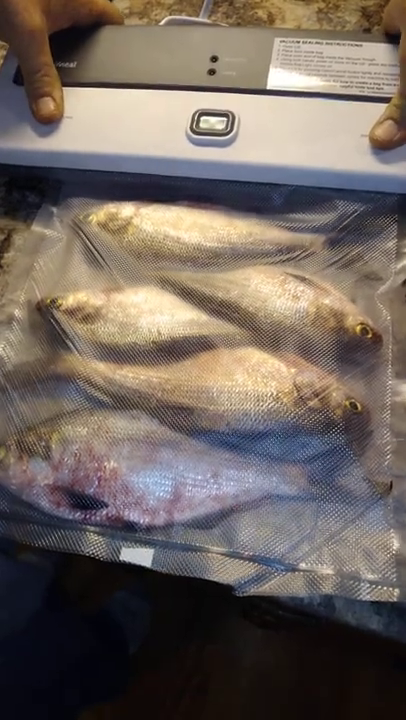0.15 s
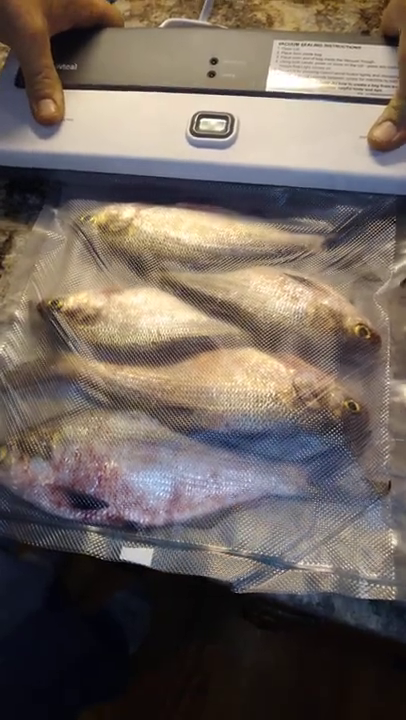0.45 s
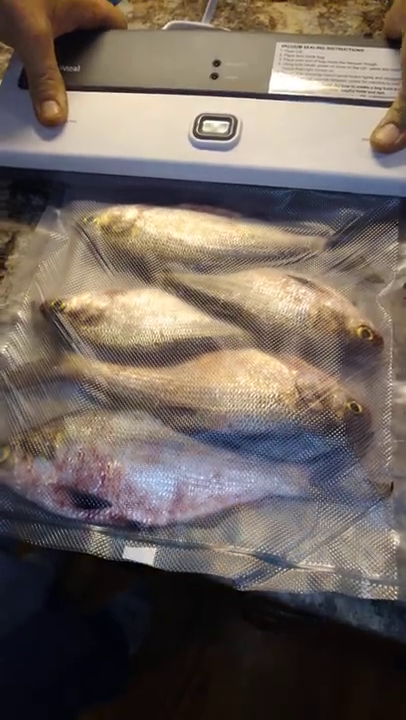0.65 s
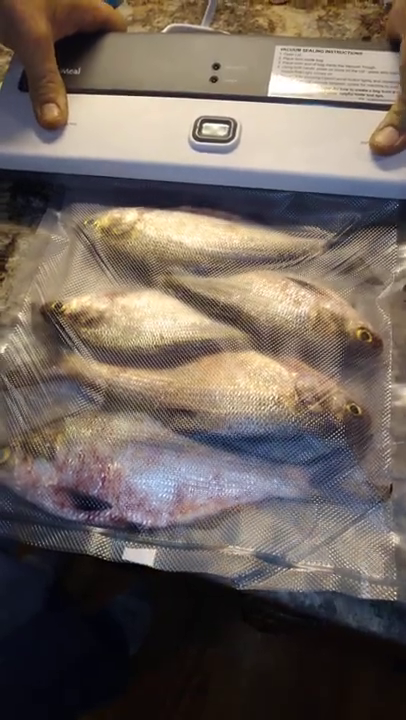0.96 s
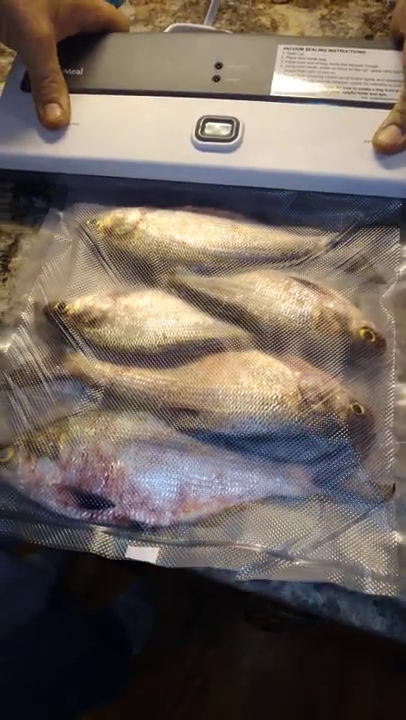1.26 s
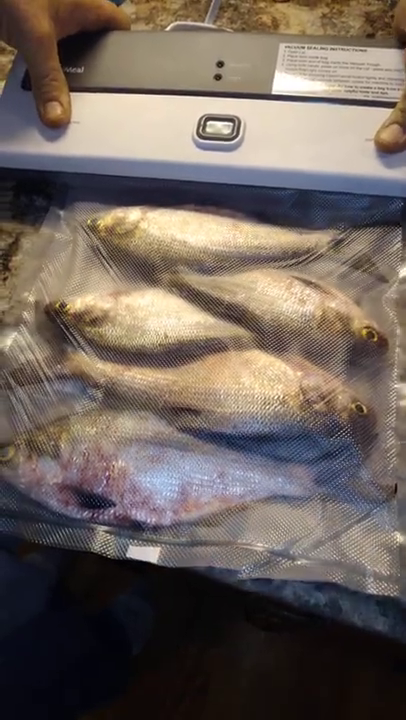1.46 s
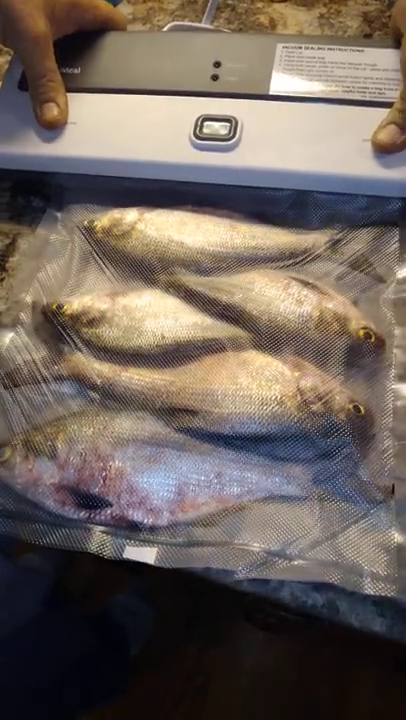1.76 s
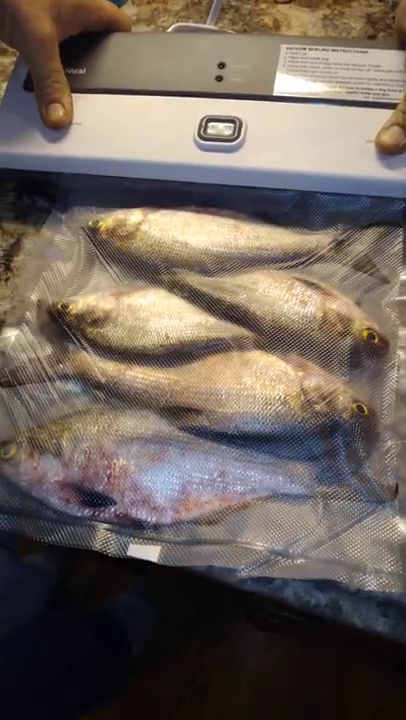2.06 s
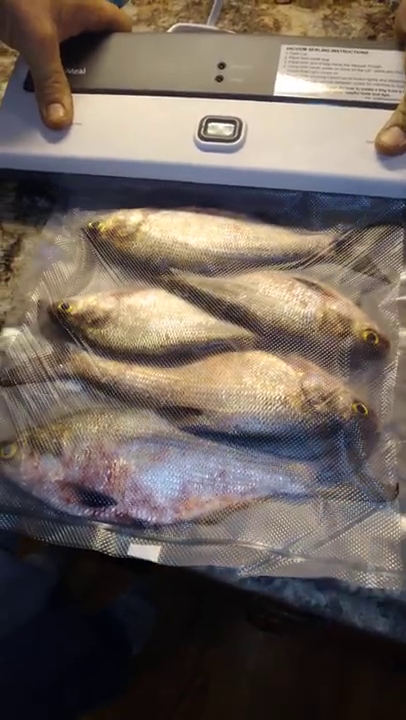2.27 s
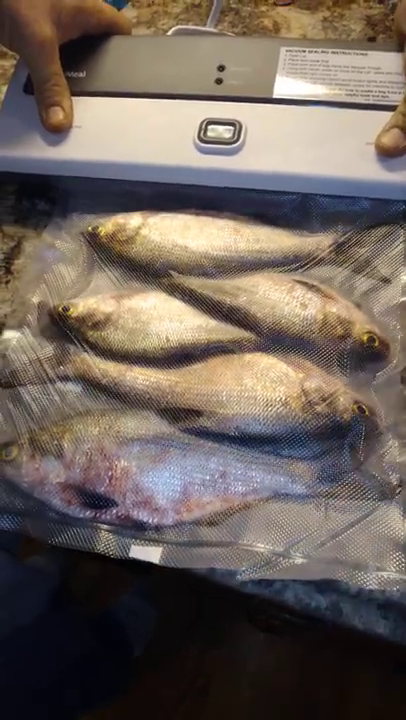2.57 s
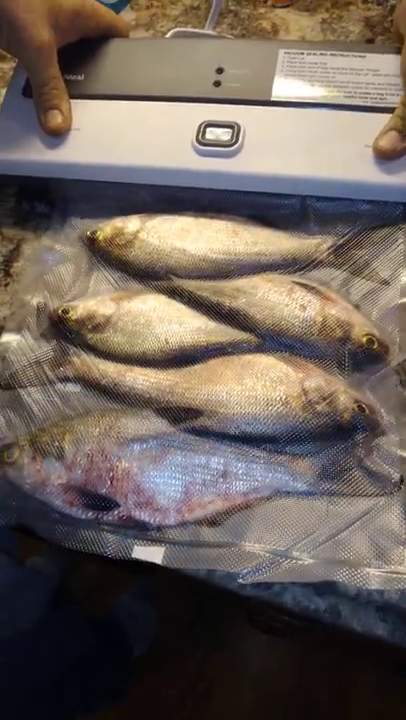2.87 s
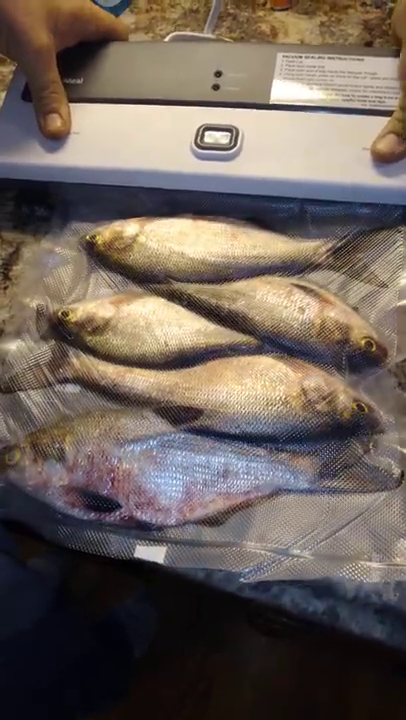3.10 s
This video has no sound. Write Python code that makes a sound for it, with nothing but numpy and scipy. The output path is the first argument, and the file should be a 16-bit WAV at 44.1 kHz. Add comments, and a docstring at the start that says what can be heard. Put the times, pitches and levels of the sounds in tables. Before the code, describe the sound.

Small electric pump of a bag sealer buzzing steadily up close, with faint late plastic ticks.

```python
"""A small vacuum-sealer pump on a kitchen counter, close to a two-microphone phone; the sound is loud at first,
then its level drops and settles. Its hum is a stack of tones at multiples of the stroke rate; its rattle is a
noise burst nearly repeated each stroke. Air noise is coloured hiss under both. Thin whines, noise through
narrow resonances, mostly of the housing, swell and fade, each over its own stretch of time; near the end a few
of them strengthen multiples of the hum. Three plastic ticks of the bag are short decaying snaps of filtered
noise. The pump's sound reaches the left microphone slightly later; the ticks are louder on the right."""
import sys
import numpy as np
from scipy import signal
from scipy.fft import rfft, irfft
from scipy.io import wavfile
from scipy.ndimage import uniform_filter1d

SR = 44100
rng = np.random.default_rng(int(sys.argv[2]) if len(sys.argv) > 2 else 0)


def wav_record(signal):
    """Record a signal, one row per channel, as 16-bit PCM in the file named by sys.argv[1]."""
    frames = np.transpose(np.atleast_2d(signal))
    bounded = np.clip(frames, -1, 1)
    # unit amplitude maps onto the largest positive 16-bit level
    quanta = np.round(bounded * 32767).astype(np.int16)
    wavfile.write(sys.argv[1], SR, quanta)


N = 142884

# Pump speed: time_s, stroke_rate_hz
PUMP_SPEED = [(0, 60.9), (.17, 60.9), (.25, 60.55), (.35, 60.4), (.53, 59.99), (1.2, 60), (2.3, 59.995),
              (2.9, 59.8), (3.24, 59.3)]
# Hum, one row per multiple of the stroke rate, before the level changes:
# settled_left_db, settled_right_db, starting_left_db, starting_right_db
HUM_TONES = [(-61.5, -59.0, -65.0, -62.5), (-49.0, -46.0, -47.0, -43.5), (-51.5, -49.5, -54.0, -51.0),
             (-65.0, -66.0, -69.0, -69.0), (-63.5, -63.5, -74.0, -72.0), (-59.0, -56.0, -54.5, -50.5),
             (-60.0, -57.5, -70.5, -71.0), (-57.5, -44.0, -56.0, -62.5), (-56.5, -49.0, -53.5, -50.5),
             (-54.0, -44.0, -52.5, -42.5), (-56.0, -48.0, -55.5, -48.0), (-59.0, -61.5, -72.0, -55.5),
             (-65.5, -63.5, -56.5, -55.5), (-64.0, -61.0, -62.0, -65.0), (-54.0, -53.0, -52.5, -50.0),
             (-53.0, -62.0, -61.0, -61.0), (-53.0, -62.5, -57.0, -62.5), (-65.0, -60.5, -56.0, -67.5),
             (-53.0, -54.0, -53.0, -54.5), (-65.0, -65.0, -58.5, -64.0), (-68.5, -55.5, -65.0, -59.0),
             (-58.0, -60.0, -60.0, -61.0), (-67.5, -59.5, -67.0, -65.5), (-57.0, -57.5, -61.0, -65.0),
             (-59.5, -55.5, -70.0, -55.5), (-62.0, -57.5, -64.0, -64.5), (-64.0, -63.0, -63.5, -55.5),
             (-59.5, -57.5, -66.0, -62.5), (-69.0, -69.0, -72.5, -62.0), (-62.5, -63.0, -67.0, -64.0)]
# Phase lead at the left microphone for multiples above LOCKED, arriving by other paths: lead_rad
LEFT_LEADS_RAD = [-2, .3, 3.1, -2, -2.2, 1.4, -2.4, -1.1, .6, -2.2, -2.9, 3.1, 1.2, -2.6, 1.6, 2, .1, -2.4]
# Level of six bands, used relative to SETTLED_S:
# time_s, bass_db, low_middle_db, middle_db, low_treble_db, treble_db, top_db
BAND_LEVELS = [(0.0, -35, -31, -33.5, -32, -33.5, -40), (0.07, -32.5, -29, -33.5, -31.5, -36, -38.5),
               (0.13, -33.5, -29, -34, -31.5, -34.5, -37.5), (0.22, -44.5, -34.5, -41, -36, -38.5, -39.5),
               (0.33, -47, -39, -50, -41.5, -41, -44.5), (0.41, -47, -40, -52, -45, -46, -45),
               (1.06, -47, -39.5, -52, -42.5, -49.5, -45.5), (1.41, -47, -40.5, -51, -47, -49.5, -47),
               (2.3, -46.5, -41, -52, -48.5, -46, -49), (2.73, -46.5, -43.5, -50, -49, -48, -47.5),
               (3.0, -46.5, -46.5, -48.5, -52, -48, -48.5), (3.1, -44.5, -46.5, -48, -45.5, -49, -46.5),
               (3.24, -46, -43, -51, -51, -47, -49)]
# Centres of those six bands: centre_hz
BAND_CENTRES = [150, 570, 1250, 2600, 6500, 14000]
# Relative rattle colour: pitch_hz, then settled_left, settled_right, starting_left, starting_right (dB per Hz)
RATTLE_COLOUR = [(1835, -4, -6, -10.5, -8), (2080, 5.5, 4.5, 0.5, 2), (2240, -9.5, 4.5, -6, -0.5),
                 (2480, -6.5, -22.5, -32, -26), (2960, -4.5, 5, 2, -2), (3530, 10, -2, -6.0, 6.5),
                 (3840, -13.5, 9, 2, -2), (4060, 13.5, 7.5, 11.5, 8), (4790, 0.5, -0.5, 6.5, 5),
                 (5380, -2, -2, 5.5, -10), (5830, 1, -0.5, -12, -27), (6540, -3.5, 5, 2, 7.5),
                 (7330, -1.5, -0.5, 1.5, -11), (8160, -9, -8, -14, -11), (8850, -8.5, -2.5, -7.5, -1),
                 (9530, -3, 6.5, -8, 5), (11600, -13, 3, -22, 0.5), (13000, -5.5, 4, -6, -2.5),
                 (14300, -8.5, -1.5, -10.5, -0.5), (15500.0, -18.5, -1.5, -8, -1)]
# Relative air noise colour: pitch_hz, level (dB per Hz)
AIR_COLOUR = [(15, -52), (40, -19), (117, -2.5), (231, -4), (475, -1), (604, -8), (784, -3.5), (2090, -6.5),
              (2410, -6.5), (3000, -8.5), (3900, -57), (6600, -120)]
# Resonance pitches at rated speed: pitch_hz; most are housing resonances, but 360, 960 and 1200 Hz sit on the
# 6th, 16th and 20th multiples and strengthen the hum near the end
WHINE_PITCHES = [4440, 4260, 3600, 3560, 6600, 6400, 9740, 9720, 10510, 12100, 12860, 15300, 11780, 9480,
                 3440, 3290, 3930, 15100, 360, 960, 1200, 2380]
# One row per resonance, level before fades and throb; an end before its start leaves it at rest: #
# smoothing_width_hz, level_db, start_s, end_s, left_minus_right_db
WHINE_STRETCHES = [(67.5, -35.5, 0.36, 1.3, 14.5), (67.6, -37.5, 0.19, 1.346, -15),
                   (105, -39.5, 0.24, 1.32, -6.5), (86.5, -51.5, 1.35, 2.65, -14),
                   (63.5, -52, 0.42, 2.32, 21.5), (88, -46, 1.73, 2.8, -12.5),
                   (110, -40.5, 0.22, 1.33, -23.5), (54, -47, 1.5, 2.1, -11), (81, -42, 0.67, 2.16, -15),
                   (68.4, -51, 0.26, 1.3, -12), (92, -41.5, 1.14, 3, 1), (120, -52.5, 1.2, 2.65, -22),
                   (91, -47, 2.15, 2.85, -15), (75, -46.5, 2.53, 2.86, -20), (99, -41.5, 2.72, 3.2, -2),
                   (200, -42.5, 2.96, 3.3, 7), (75, -32, 3.6, 3.15, 2), (200, -49, 2.8, 3.8, 14),
                   (40, -50, 3.13, 3.3, 9), (39.5, -44.5, 3.12, 3.3, 11), (40, -47.5, 3.14, 4.9, 14.5),
                   (219, -47, 3.11, 4.3, 10)]
# Plastic ticks of the bag, peak before the microphone balance: start_s, peak_db, pitch_hz
BAG_TICKS = [(2.603, -47, 1000), (2.786, -41, 1400), (3.092, -25.5, 10000)]
# Likeness of the two microphones: pitch_hz, shared_part (0 to 1)
MIC_LIKENESS = [(60, .97), (500, .85), (2000, .5), (6000, .3), (10000, .1), (15000, .2)]
# Passage from starting to settled colour: time_s, starting_share (0 to 1)
STARTING_SHARE = [(.2, 0.96), (.45, 0)]
# Part of the noise that is new each stroke: pitch_hz, new_share (0 to 1)
NEW_SHARE = [(1500, .22), (4500, .3), (7000, .42), (15000, .5)]

RATED_HZ, FIRST_TURN = 60, .02  # strokes per second; stroke position at the start (turns)
SETTLED_S = 2  # moment that the band levels are compared with
LEFT_LAG_S = 0.0003554  # later arrival at the left microphone
EDGE_HZ = 15700  # upper band limit

HUM_LEAD, HUM_SWEEP = .43, .012  # hum ahead of rattle; delay growing with the multiple (turns)
LOCKED, HUM_SCATTER = 12, 1.5  # last multiple that pulses in step; phase spread above it (rad)
HUM_WAVER_DB, HUM_SLIP = .7, .01  # level wander; phase wander per multiple (rad)

RATTLE_DB, JAGGED = -33.5, .75  # level before band changes; spectral unevenness kept (0 to 1)
BURST_DEPTH, RIPPLE = .66, .22  # loudness dip between strokes; depth of the three smaller knocks
DRIFT_PER_S = .61  # burst shapes passed through per second
PATCH_DB, PATCH_S = 3.2, .6  # size of small drifting spectral peaks; length of each smoothing

AIR_DB, AIR_PAN_DB = -52.5, -1.5  # level before band changes; left against right

WHINE_LEAD, WHINE_LOOSE = .15, .2  # ahead of rattle (turns); gain of chatter new each stroke
WHINE_FADE_S, WHINE_THROB, WHINE_REST = .12, .6, .04  # fade; burst exponent; gain outside its stretch

TICK_WIDTH, TICK_T60 = .49, .066  # share of the pitch; time to fall 60 dB (s)


def amp(db):
    """Turns decibels into gain."""
    return 10 ** (np.asarray(db) / 20)


def evened(x):
    """Scales a signal to unit mean power."""
    return x / np.sqrt(np.mean(x ** 2) + 1e-20)


def read(points, hz):
    """Reads a curve along a logarithmic pitch axis."""
    f, value = np.transpose(points)
    return np.interp(np.log(hz + 1), np.log(f + 1), value)


def level_db(t, hz):
    """Level of each frequency over time, against the settled run."""
    times, *levels = np.transpose(BAND_LEVELS)
    bands = np.array([np.interp(t, times, r) - np.interp(SETTLED_S, times, r) for r in levels])
    numbers = np.arange(len(bands))
    place = np.interp(np.log(hz + 1), np.log(BAND_CENTRES), numbers)
    weights = np.clip(1 - abs(place[:, None] - numbers), 0, 1)
    return weights @ bands


def blended(columns, t):
    """Left and right dB over time, moving from the starting colour to the settled one."""
    share = np.clip(np.interp(t, *np.transpose(STARTING_SHARE)), 0, 1)
    return columns[:2, :, None] * (1 - share) + columns[2:, :, None] * share


def hum(turns):
    """Low multiples of the stroke rate as clean tones that waver a little in level and phase."""
    k = np.arange(1, len(HUM_TONES) + 1)
    t, now = np.arange(0, N + 256, 256) / SR, np.arange(N) / SR
    wander = uniform_filter1d(rng.standard_normal((len(t), len(k), 2)), size=12, axis=0)
    waver, slip = evened(wander).T
    tone_db = blended(np.transpose(HUM_TONES), t) + level_db(t, k * RATED_HZ) + HUM_WAVER_DB * waver
    gain = amp(tone_db) * np.exp(1j * HUM_SLIP * k[:, None] * slip)
    scatter = HUM_SCATTER * (2 * rng.random(len(k)) - 1) * (k > LOCKED)
    out = np.zeros((2, N))
    for i, m in enumerate(k):
        phase = 2 * np.pi * m * (turns + HUM_LEAD - HUM_SWEEP * m) + scatter[i]
        tone = np.exp(1j * phase)
        if m > LOCKED:
            left_phase = LEFT_LEADS_RAD[i - LOCKED]
        else:
            left_phase = -2 * np.pi * m * RATED_HZ * LEFT_LAG_S
        left = np.exp(1j * left_phase) * np.interp(now, t, gain[0, i])
        right = np.interp(now, t, gain[1, i])
        out += np.sqrt(2) * (tone * np.array([left, right])).real
    return out


def burst(turns):
    """Loudness through one stroke, highest at whole turns, with three smaller knocks."""
    knocks = 1 + RIPPLE * np.cos(3 * 2 * np.pi * turns)
    return (1 - BURST_DEPTH * (1 - np.cos(2 * np.pi * turns)) / 2) * knocks


def strokes(turns, jagged):
    """One burst of chatter repeated each stroke, slowly changing, and chatter that is new every time."""
    size = 736  # samples in a stroke shape
    shapes = rng.standard_normal((12, size))
    envelope = burst(np.arange(size) / size)
    # Alternately impose the stroke's loudness and flatten the spectrum.
    for _ in range(4):
        loudness = uniform_filter1d(abs(shapes), size=90, mode="wrap")
        z = rfft(shapes * envelope / loudness)
        shapes = irfft(z / abs(z) ** (1 - jagged), size)
    # Eight times finer, so that the stroke position can be looked up directly.
    fine = irfft(rfft(shapes / shapes.std(1, keepdims=True)), size * 8)
    at = (turns % 1 * size * 8).astype(int)
    place = np.arange(N) / SR * DRIFT_PER_S
    k = place.astype(int)
    fade = np.pi / 2 * (place % 1)
    kept = np.cos(fade) * fine[k, at] + np.sin(fade) * fine[k + 1, at]
    new = burst(turns) * rng.standard_normal(N)
    return evened(kept), evened(new)


def drifting_patches(frames, bins):
    """Smoothed random spectral peaks, different at each microphone."""
    span = round(PATCH_S * SR / 128)
    patches = rng.standard_normal((frames, 2, bins))
    for _ in range(2):
        patches = uniform_filter1d(patches, span, 0, mode="wrap")
    return evened(uniform_filter1d(patches, size=2, axis=2)).transpose(1, 2, 0)


def coloured(sources, spectrum, patch_db):
    """Colours steady and loose parts for both microphones; the second pair reaches only the left one."""
    hz, t, (a, a_new, b, b_new) = signal.stft(np.array(sources), SR, nperseg=512, noverlap=384)
    loose = np.clip(read(NEW_SHARE, hz), 0, 1)[:, None]
    za, zb = np.sqrt(1 - loose ** 2) * np.array([a, b]) + loose * np.array([a_new, b_new])
    same = np.clip(read(MIC_LIKENESS, hz), 0, 1)[:, None]
    lag = np.exp(-2j * np.pi * hz * LEFT_LAG_S)[:, None]
    left = (same * za + np.sqrt(1 - same ** 2) * zb) * lag
    f, *columns = np.transpose(spectrum)
    colour = np.array([read(np.transpose([f, c]), hz) for c in columns])
    z = np.array([left, za]) * amp(blended(colour, t))
    z = z * amp(patch_db * drifting_patches(len(t), len(hz)))
    # Unit power is set before the band levels change the sound.
    flat = signal.istft(z, SR, nperseg=512, noverlap=384)[1]
    scale = np.sqrt(np.mean(flat ** 2))
    shaped = signal.istft(z * amp(level_db(t, hz)), SR, nperseg=512, noverlap=384)[1]
    return shaped[:, :N] / scale


def rattle(turns):
    """Mechanical chatter pulsing with each stroke, partly repeated and partly new."""
    sources = strokes(turns, JAGGED) + strokes(turns, JAGGED)
    spectrum = [(1750, -40, -40, -40, -40)] + RATTLE_COLOUR  # the first row thins the sound below the rattle
    return amp(RATTLE_DB) * coloured(sources, spectrum, PATCH_DB)


def air():
    """Air noise: random hiss, mostly low and middle, without stroke pulses."""
    spectrum = [(hz, db + AIR_PAN_DB, db, db + AIR_PAN_DB, db) for hz, db in AIR_COLOUR]
    return amp(AIR_DB) * coloured(rng.standard_normal((4, N)), spectrum, 0)


def resonate(x, hz, width):
    """A narrow resonance: shifts hz down to zero, smooths twice and shifts back."""
    turn = np.exp(2j * np.pi * np.cumsum(hz) / SR)
    r = np.exp(-np.pi * width / SR)
    smooth = x / turn
    for _ in range(2):
        smooth = signal.lfilter([1 - r], [1, -r], smooth)
    return turn * smooth


def whines(turns, speed):
    """Narrow resonances rung by each stroke, following pump speed, each heard for a stretch; near the end some
    of them strengthen hum multiples."""
    kept, new = strokes(turns + WHINE_LEAD, 0)
    chatter = kept + WHINE_LOOSE * new
    t, out = np.arange(N) / SR, np.zeros((2, N))
    throb = burst(turns) ** WHINE_THROB
    for hz, (width, db, start, end, pan) in zip(WHINE_PITCHES, WHINE_STRETCHES):
        ring = resonate(chatter, hz * speed / RATED_HZ, width)
        ring = ring / np.sqrt(np.mean(ring.real ** 2))
        fade = np.clip(np.minimum(t - start, end - t) / WHINE_FADE_S + .5, WHINE_REST, 1)
        ring = amp(db) * fade * throb * ring
        lag = np.exp(-2j * np.pi * hz * LEFT_LAG_S)
        out += np.array([ring * amp(pan / 2) * lag, ring * amp(-pan / 2)]).real
    return out


def ticks():
    """Short snaps of the bag's plastic film, nearer the right microphone: decaying filtered noise."""
    t, out = np.arange(2000) / SR, np.zeros(N)
    for start, db, hz in BAG_TICKS:
        ring = resonate(rng.standard_normal(len(t)), hz + 0 * t, TICK_WIDTH * hz).real
        snap = ring * amp(-60 * t / TICK_T60)
        out[round(start * SR):][:len(t)] += amp(db) * snap / abs(snap).max()
    return out * amp([[-5], [3]])  # left, right dB


def scene():
    """Rattle, air noise, hum, whines and ticks at the two microphones."""
    speed = np.interp(np.arange(N) / SR, *np.transpose(PUMP_SPEED))
    turns = FIRST_TURN + np.cumsum(speed) / SR
    chatter = rattle(turns)
    hiss = air()
    return hum(turns) + chatter + hiss + whines(turns, speed) + ticks()


def record(dry):
    """The band limit: a steep low-pass on both microphones."""
    low_pass = signal.firwin(511, EDGE_HZ, window=("kaiser", 9), fs=SR)
    return signal.oaconvolve(dry, low_pass[None], "same")


dry = scene()
out = record(dry)
wav_record(out)
```